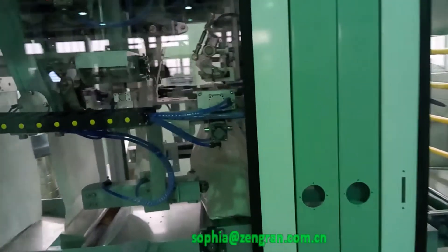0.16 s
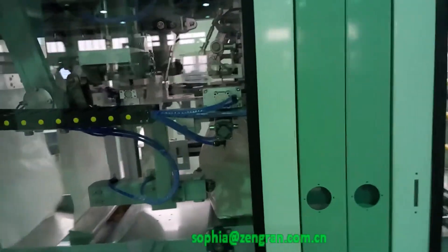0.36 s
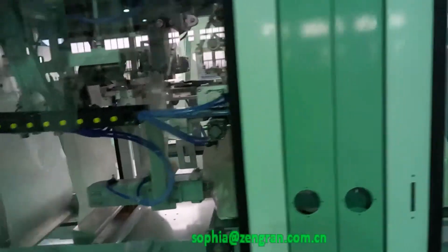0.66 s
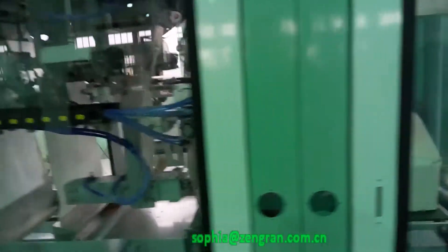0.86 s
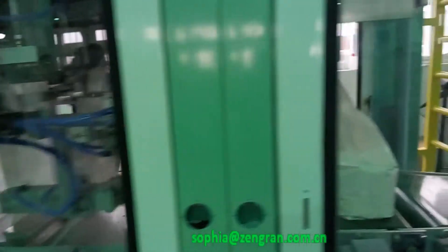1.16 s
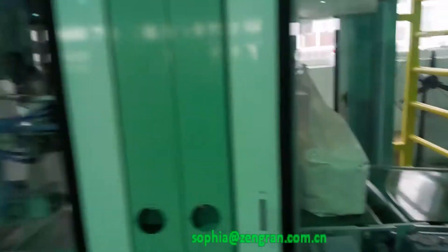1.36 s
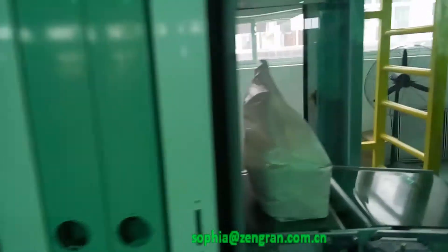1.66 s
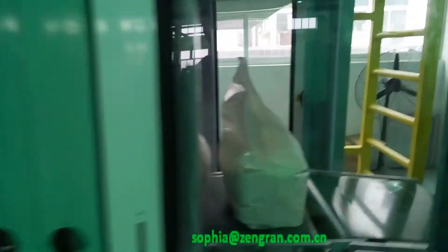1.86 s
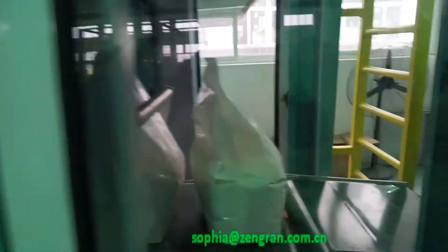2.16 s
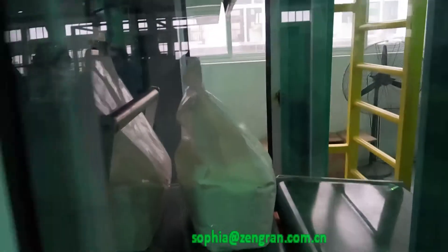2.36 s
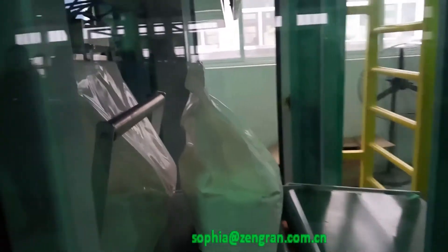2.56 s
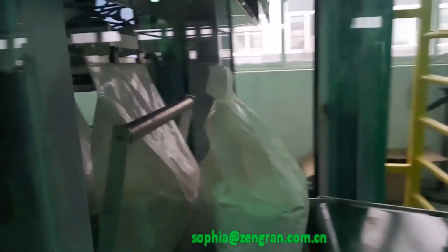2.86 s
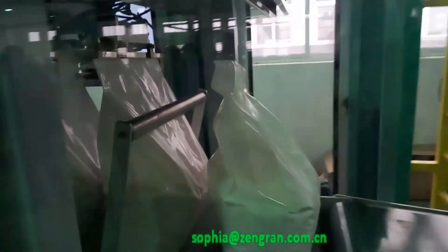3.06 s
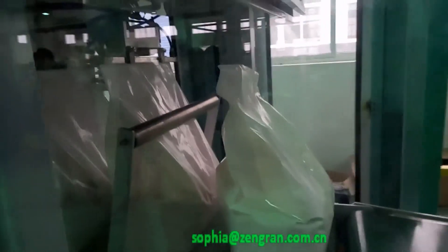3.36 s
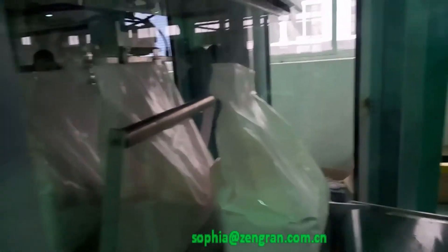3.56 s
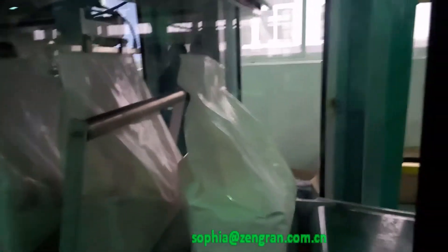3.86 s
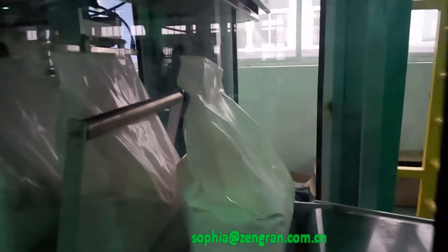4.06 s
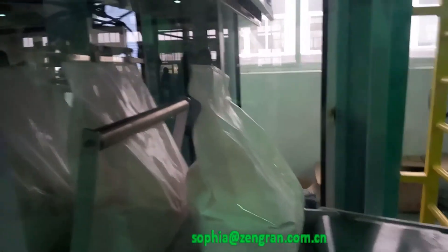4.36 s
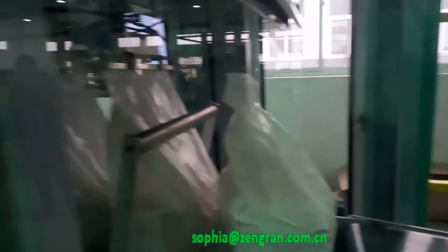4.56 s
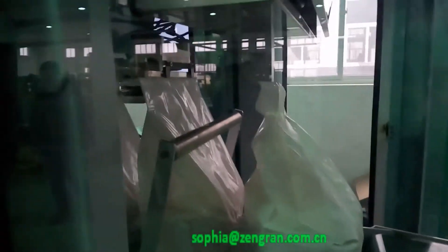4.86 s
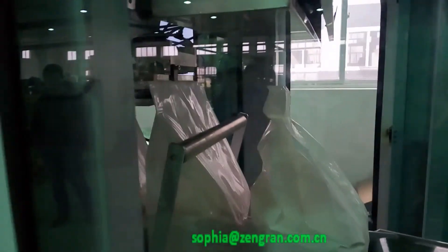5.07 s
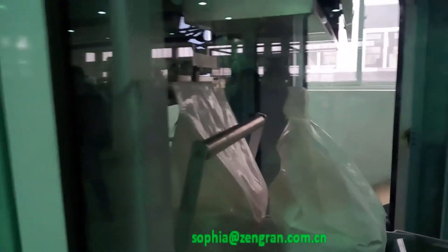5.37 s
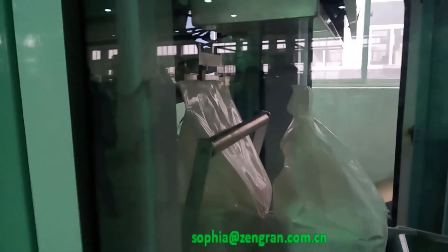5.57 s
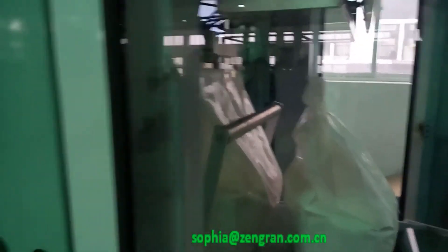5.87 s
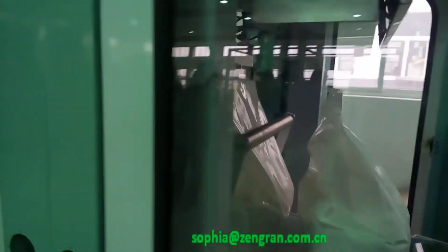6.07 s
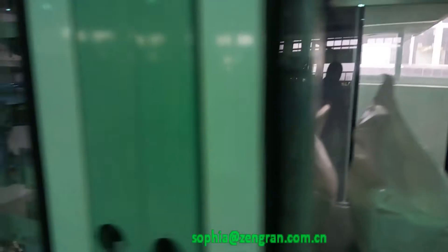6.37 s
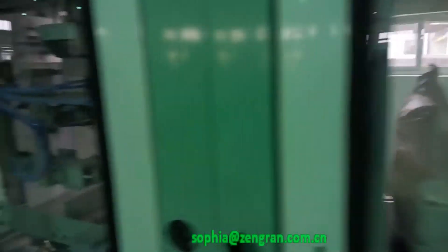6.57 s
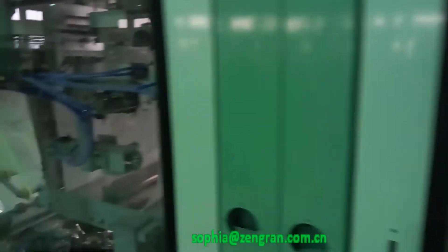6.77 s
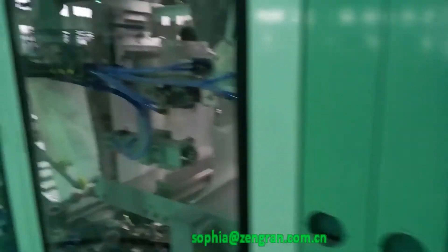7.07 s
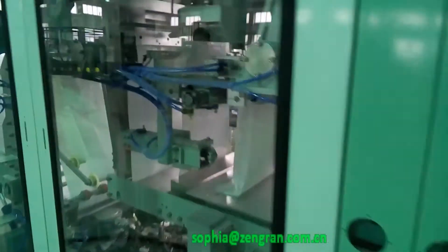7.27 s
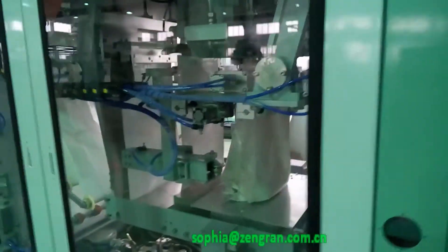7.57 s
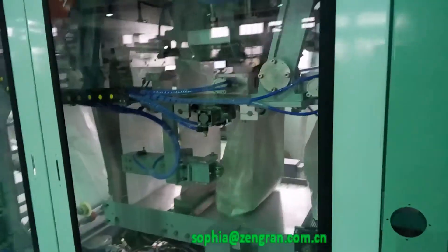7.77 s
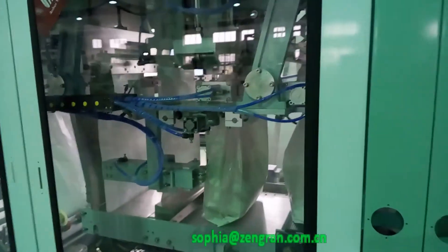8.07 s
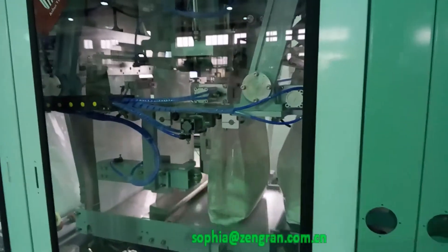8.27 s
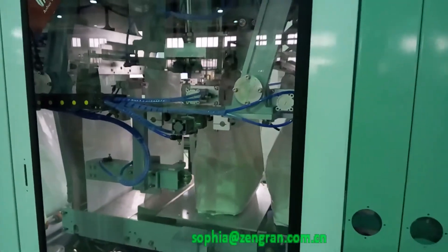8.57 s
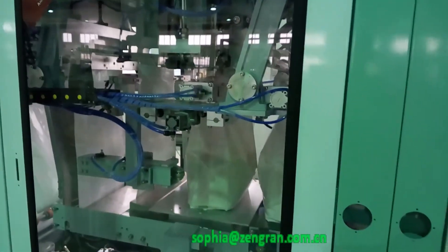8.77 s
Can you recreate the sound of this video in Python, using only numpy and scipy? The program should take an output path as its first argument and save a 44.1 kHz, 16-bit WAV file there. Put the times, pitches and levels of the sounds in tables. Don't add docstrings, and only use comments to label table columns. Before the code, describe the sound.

Inside a factory hall, a bagging machine's pump drones continuously, a low fluttering hum with a buzzing metallic edge, over broad roar and leaking air. Soft hisses and thumps come in the first second, a sharp air burst at three seconds, faint chirps near four, then a busy cluster of hisses, clunks and a squeak just after seven. One small handheld microphone pans close to the machine, its tone shifting slightly.

```python
import sys
import numpy as np
from scipy import signal
from scipy.fft import rfft, irfft
from scipy.io import wavfile

SR = 44100
rng = np.random.default_rng(int(sys.argv[2]) if len(sys.argv) > 2 else 0)


def to_wav(sig):
    pcm = np.clip(np.atleast_2d(sig), -1, 1) * 32767
    pcm = np.round(pcm).astype(np.int16)
    wavfile.write(sys.argv[1], SR, pcm.T)


def magnitude_from_level(level_db):
    exponent = np.asarray(level_db, float) / 20
    return 10 ** exponent


N = 393372
TIME = np.arange(N) / SR
HZ = np.maximum(np.fft.rfftfreq(N, 1 / SR), 1)

# time in seconds, progress along the route (0-5), pump level by nearness in dB.
MIC_PATH = [(0, 0.01, -1.5), (.5, 0.0075, 0), (1.3, 0.35, -1.5), (2.0, 0.98, -2), (2.55, 1.24, 0.3),
            (3.0, 1.61, -0.6), (3.8, 2.1, -.5), (4.5, 2.13, 0.4), (5.3, 2.2, -0.8), (5.8, 2.7, 0),
            (6.3, 3.08, 0.5), (7.0, 3.6, 1.2), (7.7, 3.89, -1), (8.92, 5.05, -1.7)]
ROUTE_SPOTS = [0, 1, 2, 1, 3]
# progress, conveyor rumble in dB, leaking air in dB, fans in dB,
# distant clatter in dB.
HALL_STOPS = [(0, 1, 1.5, -3, 0.5), (.6, 3, 1, -5, 1.5), (.9, 5, 0, -3, -1.5), (1.05, -2, 1, 2, -0.5),
              (1.8, -3, 1.5, 4, 0), (2.1, -2.5, -1, 1, -0.5), (2.45, -5, -2, 4, 1), (2.7, -4, -4.5, 3, 0.5),
              (3.3, 0, -4.5, -4, -2), (4.05, 1, -1, -1, 0.6), (4.5, 0, -4, -2, -1),
              (4.9, -1.5, -2.5, 0, 0.5)]

ROAR_ANCHOR_HZ = [200, 500, 2000, 6000, 11000]
# frequency in Hz, level in dB per Hz.
ROAR_SPECTRUM = [(18, -40), (30, -30), (50, -29), (100, -13), (170, -10), (240, -13.5), (400, -11.5),
                 (600, -7.5), (850, -11.5), (1100, -14),
                 (1300, -16.5), (1520, -13.5), (2000, -20.5), (2800, -22), (3500, -24), (4400, -17.5),
             (4900, -19), (5900, -12.5), (6600, -16), (7600, -24), (8400, -33.5), (10000, -37.5),
             (12000, -41), (15600, -41)]
# frequency in Hz, width in Hz, level above the hiss in dB.
LEAK_WHISTLES = [(5800, 43, 1.5), (6220, 26, 4.5), (6540, 43, 5.5)]
ROAR_DB = -19
AIR_TOP_SHARE = 0.88

# frequency in Hz, level in dB.
FANS = [(23.6, -43), (26.2, -44.5)]
# start in seconds, level in dB, frequency in Hz, length in seconds.
SQUEAKS = [
    (3.762, -26, 5330, .02),
    (3.785, -26, 5150, .015),
    (7.42, -21, 4400, .025),
]
# start in seconds, level in dB, centre in Hz, width in octaves,
# t60 in seconds.
THUMPS = [(0.76, -26, 72, 0.8, 0.27), (6.15, -26, 990, .3, 1.3), (2.95, -27.5, 1500, .4, .9),
          (.69, -21, 730, 1.4, 0.4), (2.6, -20.5, 1130, 0.92, 0.53), (3.1, -32, 84, 0.56, 1.7),
          (5.0, -23, 140, 0.79, 0.78), (7.17, -17, 1100, 1.9, 2.3), (7.455, -15.5, 690, 1.24, 0.77),
          (7.45, -26.5, 100, 0.64, 0.72), (7.27, -26, 250, 0.16, 1.1), (7.45, -25.5, 243, 0.086, 0.66),
          (7.452, -25, 3400, 0.47, 0.76), (3.5, -36, 2020, 0.085, .4), (8.33, -21, 234, 0.2, .7),
          (8.45, -19, 630, 0.39, .8)]
THUMP_RISE_PER_T60 = 0.016

# start in seconds, level in dB, rise in seconds, hold in seconds, top tilt in dB.
JETS = [(0.643, -21, .012, .03, 0), (1.01, -18.5, 0.033, 0.07, -10), (2.557, -18.5, 0.031, 0.16, -12),
        (3.043, -11.5, 0.0056, 0.075, -0.5), (3.103, -22, 0.046, 0.065, -10), (5.06, -20, 0.017, 0.19, -9),
        (7.025, -20, 0.016, 0.059, -10), (7.163, -13, 0.035, 0.083, 2.5), (7.228, -20, 0.018, 0.026, -4),
        (7.3, -19, 0.05, 0.044, 2.5), (7.396, -25, 0.012, 0.016, -10), (7.44, -12.5, 0.017, 0.0087, -12),
        (7.5, -26.5, 0.026, 0.25, -14), (8.233, -24.5, 0.023, 0.11, -5)]
# frequency in Hz, level in dB per Hz.
JET_SPECTRUM = [(1500, -45), (2500, -17), (3050, -18.5), (4000, -10.5), (5000, -4), (5900, 1), (6570, -0.5),
                (8130, -20), (11700, -20.5), (15600, -20)]
JET_T60_S, JET_T60_PER_HOLD = 0.18, 5.9

# frequency in Hz, width in Hz, levels at the four spots in dB,
# progress where shading sets in.
VALVE_RESONANCES = [(2770, 70, [-48, -55, -38.5, -50], 2.12), (4460, 190, [-32.5, -36.5, -36, -44], 2.4)]
VALVE_AT_S, VALVE_T60_S = .004, .13

STROKE_HZ = 14.692
# multiple of the stroke rate, then levels in dB at grippers,
# behind door, at conveyor, at filler.
SHELL_ORDERS = [(4, -48, -53, -54, -50), (5, -48, -51, -49, -49), (7, -40, -44, -46, -43),
                (8, -49, -42, -40, -47), (10, -35, -32, -33, -35), (11, -32, -22, -22, -29),
                (12, -21, -19, -16, -20), (13, -29, -31, -25, -29), (14, -37, -33, -32, -36)]
# multiple of the stroke rate, then
# levels in dB at the same four spots.
PIPE_AND_FRAME_ORDERS = [(17, -42, -36, -34, -43), (23, -33, -37, -31, -31), (24, -34, -38, -31, -35),
                         (25, -29, -36, -32, -30), (27, -36, -38, -31, -34), (31, -37, -40, -28, -37),
                         (33, -37, -45, -30, -42), (35, -43, -40, -30, -33), (36, -26, -38, -26, -40),
                         (37, -27, -39, -32, -28), (41, -42, -42, -37, -35), (51, -40, -37, -37, -55),
                         (55, -36, -40, -34, -32), (59, -34, -42, -52, -38),
                         (18, -41, -36, -36, -38), (19, -41, -37, -46, -52), (20, -38, -44, -35, -37),
                (22, -36, -44, -41, -34), (26, -47, -42, -39, -48), (28, -41, -40, -39, -42),
                (34, -36, -43, -41, -34), (38, -35, -40, -38, -45), (39, -40, -41, -36, -50),
                (43, -36, -48, -50, -36), (44, -43, -44, -40, -37), (47, -37, -45, -41, -37),
                (53, -42, -40, -40, -44), (56, -36, -41, -38, -37)]
FAINT_ORDERS = [16, 29, 30, 32, 40, 42, 46, 48, 50, 54, 57, 58, 61, 62, 63, 64, 66]
FAINT_DB, FAINT_SCATTER_DB = -44.5, 3
WALL_LEAD_RAD = [2.2, 0, 0, 2.0]
SMEAR_RAD, LAG_DRIFT_RAD = 1.2, -.42

# frequency in Hz, level in dB per Hz.
SELF_NOISE = [(4000, -30), (9000, -6), (13000, 4), (15600, 2)]
SELF_NOISE_DB = -47
CUTOFF_HZ = 15560


def rms_one(x):
    return x / np.sqrt(np.mean(x ** 2) + 1e-20)


def in_time(rows):
    s, *columns = np.transpose(rows)
    return [np.interp(TIME, s, c) for c in columns]


def along_route(column):
    stops = np.transpose(HALL_STOPS)
    return np.interp(in_time(MIC_PATH)[0], stops[0], stops[column])


def coloured(points):
    hz, db = np.transpose(points)
    shape = magnitude_from_level(np.interp(np.log(HZ), np.log(hz), db))
    return rfft(rng.standard_normal(N)) * shape / np.sqrt(np.mean(shape ** 2))


def drift(rate_hz):
    knots_hz = 80
    knots = rng.standard_normal(int(N / SR * knots_hz) + 2)
    r = np.exp(-2 * np.pi * rate_hz / knots_hz)
    slow = signal.lfilter([1], [1, -2 * r, r * r], np.tile(knots, 2))[len(knots):]
    return np.interp(TIME * knots_hz, np.arange(len(slow)), rms_one(slow - slow.mean()))


def burst(start_s, rise_s, hold_s, t60_s):
    since = TIME - start_s
    fall_s = np.clip(since - rise_s - hold_s, 0, 3)
    return np.clip(since / max(rise_s, 1e-3), 0, 1) * magnitude_from_level(-60 * fall_s / t60_s)


def hall(curves_db, patchy_db, rattle_db):
    whistles_db = sum(db * np.exp(-((HZ - hz) / width) ** 2) for hz, width, db in LEAK_WHISTLES)
    roar = coloured(ROAR_SPECTRUM) * magnitude_from_level(whistles_db)
    change_db = np.array([np.zeros(N)] + curves_db)
    rattle = drift(9)
    stroke = np.cos(2 * np.pi * (STROKE_HZ * TIME - .4))
    shared_db = rattle_db * rattle + 0.24 * stroke
    out = 0
    for centre in np.log2(12.5) + np.arange(32) / 3:
        window = np.cos(np.pi / 2 * np.clip(3 * (np.log2(HZ) - centre), -1, 1)) ** 2
        place = np.interp(centre, np.log2(ROAR_ANCHOR_HZ), np.arange(5))
        slow_db = np.clip(1 - abs(place - np.arange(5)), 0, 1) @ change_db
        level_db = slow_db + patchy_db * drift(2.3) + min(place, 3) * shared_db
        out = out + irfft(roar * window, N) * magnitude_from_level(level_db)
    return magnitude_from_level(ROAR_DB) * out


def fans():
    lines = sum(magnitude_from_level(db) * np.cos(2 * np.pi * hz * (TIME - 2.8)) for hz, db in FANS)
    return np.sqrt(2) * lines * magnitude_from_level(along_route(column=3))


def squeaks():
    out = 0
    for s, db, hz, length_s in SQUEAKS:
        out = out + magnitude_from_level(db) * burst(s, 0.0046, length_s, .04) * np.sin(2 * np.pi * hz * TIME)
    return out


def thumps():
    white = rfft(rng.standard_normal(N))
    out = 0
    for s, db, hz, octaves, t60_s in THUMPS:
        shape = burst(s, THUMP_RISE_PER_T60 * t60_s, 0, t60_s) * (TIME < s + t60_s)
        band = irfft(white * np.exp(-(np.log2(HZ / hz) / octaves) ** 2), N)
        out = out + magnitude_from_level(db) * np.std(shape) * rms_one(shape * band)
    return out


def jets():
    noise = coloured(JET_SPECTRUM)
    bright = 1 / (1 + (8000 / HZ) ** 6)
    dark = 1 / (1 + (HZ / 5000) ** 8)
    low = irfft(noise * dark, N)
    body = irfft(noise * (1 - bright - dark), N)
    top = irfft(noise * bright, N)
    out = 0
    for s, db, rise_s, hold_s, tilt_db in JETS:
        t60_s = JET_T60_S + JET_T60_PER_HOLD * hold_s
        jet = low * burst(s, rise_s + 0.014, hold_s, 1.5 * t60_s)
        jet = jet + body * burst(s, rise_s, hold_s, t60_s)
        jet = jet + magnitude_from_level(tilt_db) * top * burst(s, rise_s, hold_s, 0.61 * t60_s)
        out = out + magnitude_from_level(db) * jet
    return out * magnitude_from_level(.8 * drift(25))


def valve():
    progress = in_time(MIC_PATH)[0]
    since = (TIME - VALVE_AT_S) % (1 / STROKE_HZ)
    repeated = rng.standard_normal(SR)[(since * SR).astype(int)]
    puff = .8 * repeated + .6 * rng.standard_normal(N)
    puff = puff * np.minimum(since / .005, 1) * magnitude_from_level(-60 * since / VALVE_T60_S + 1.5 * drift(3))
    out = 0
    for hz, width_hz, level_db, shaded_from in VALVE_RESONANCES:
        shade_db = -7 * np.clip(8 * (progress - shaded_from), 0, 1) * np.clip(4 - progress, 0, 1)
        heard_db = np.interp(progress, np.arange(5), np.array(level_db)[ROUTE_SPOTS]) + shade_db
        r = np.exp(-np.pi * width_hz * 1.5 / SR)
        poles = [1, -2 * r * np.cos(2 * np.pi * hz / SR), r * r]
        ring = signal.lfilter([1, 0, -1], poles, puff)
        ring = signal.lfilter([1], poles, ring)
        out = out + magnitude_from_level(heard_db) * rms_one(ring)
    return out


def pump():
    hop = 64
    progress, near_db = [c[::hop] for c in in_time(MIC_PATH)]
    progress = np.clip(progress, 0, 4)
    shaded = np.interp(progress, [0, .85, 1, 1.2, 1.7, 2, 3, 3.6, 4], [0, .2, 1, 1.1, 1.9, 2, 3, 3.3, 4])
    smear = np.cumsum(SMEAR_RAD * rng.standard_normal(70) + LAG_DRIFT_RAD * (np.arange(70) - 33))
    faint = [(order, *(FAINT_DB + FAINT_SCATTER_DB * rng.standard_normal(4))) for order in FAINT_ORDERS]
    out = np.zeros(N)
    for order, *level_db in sorted(SHELL_ORDERS + PIPE_AND_FRAME_ORDERS + faint):
        scattered = order > 14
        phase = np.pi * (order + np.clip((order - 12) / 2, 0, 1) ** 2)
        phase = phase + np.array(WALL_LEAD_RAD) * (order > 11)
        phase = phase + (rng.uniform(-1, 1, 4) + smear[order]) * scattered
        field = magnitude_from_level(np.array(level_db)) * np.exp(1j * phase)
        place = shaded if scattered else progress
        weight = np.clip(1 - abs(place - np.arange(5)[:, None]), 0, 1)
        wander_db = 1.0 * scattered + .05 * max(order - 10, 0) * drift(.8)[::hop]
        here = (field[ROUTE_SPOTS] @ weight) * magnitude_from_level(near_db + wander_db)
        here = here * np.exp(.45j * scattered * drift(1.2)[::hop])
        turn = 2 * np.pi * order * STROKE_HZ * TIME
        out += np.interp(TIME, TIME[::hop], here.real) * np.cos(turn)
        out -= np.interp(TIME, TIME[::hop], here.imag) * np.sin(turn)
    return np.sqrt(2) * out


def scene():
    rumble_db, air_db, clatter_db = along_route(column=1), along_route(column=2), along_route(column=4)
    curves_db = [rumble_db, clatter_db, air_db, AIR_TOP_SHARE * air_db]
    mono = hall(curves_db, patchy_db=1.28, rattle_db=0.1555) + fans()
    mono = mono + squeaks() + thumps() + jets() + valve() + pump()
    return np.array([mono, mono])


def band_limit(x):
    return signal.sosfilt(signal.butter(12, 15810, fs=SR, output="sos"), x)


def record(dry):
    heard = dry + magnitude_from_level(SELF_NOISE_DB) * irfft(coloured(SELF_NOISE), N)
    rounded = heard / (1 + abs(heard / .98) ** 8) ** (1 / 8)
    mix = irfft(rfft(rounded) * (HZ < CUTOFF_HZ), N)
    return band_limit(mix)


dry = scene()
out = record(dry)
to_wav(out)
```